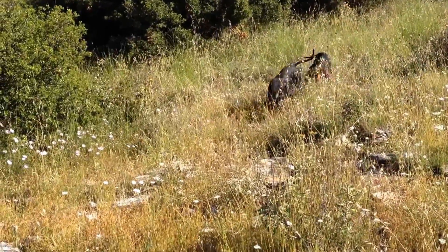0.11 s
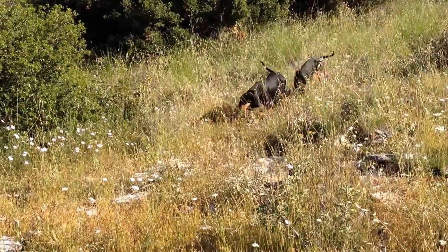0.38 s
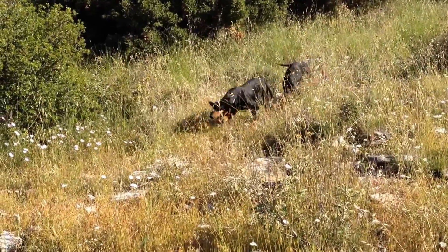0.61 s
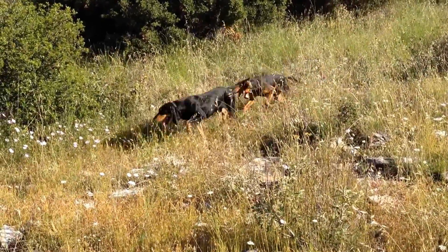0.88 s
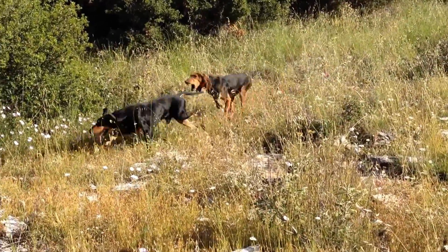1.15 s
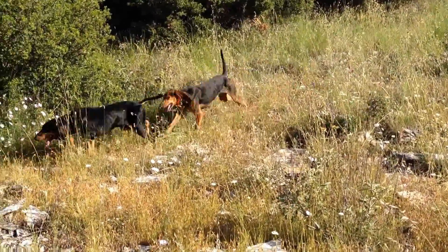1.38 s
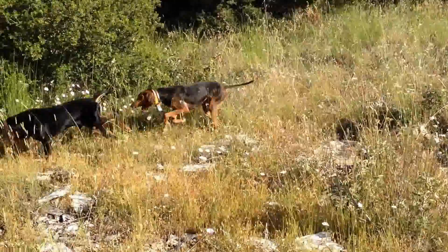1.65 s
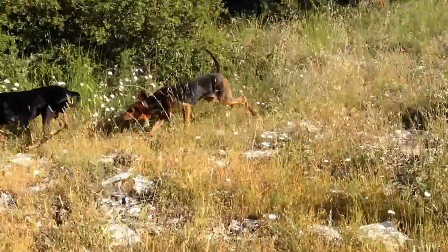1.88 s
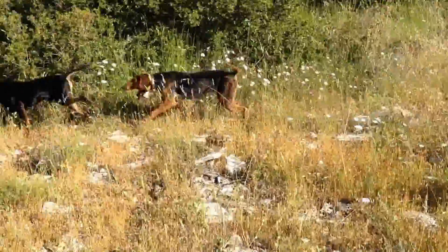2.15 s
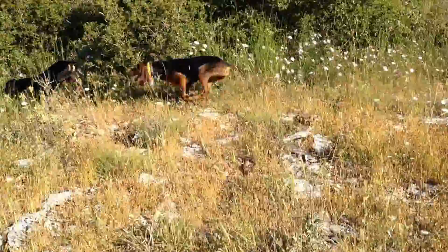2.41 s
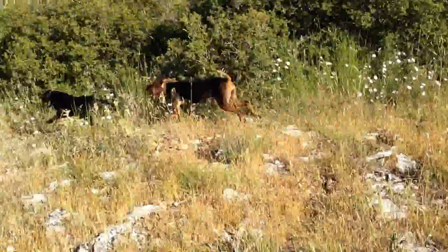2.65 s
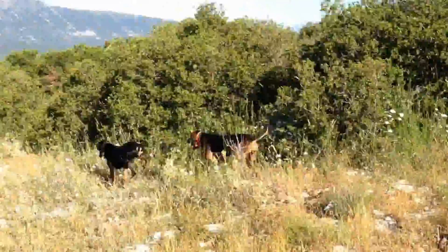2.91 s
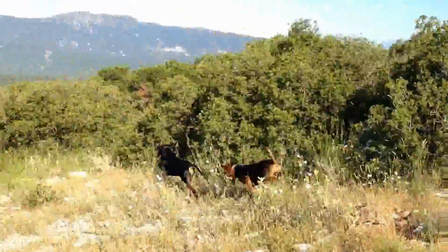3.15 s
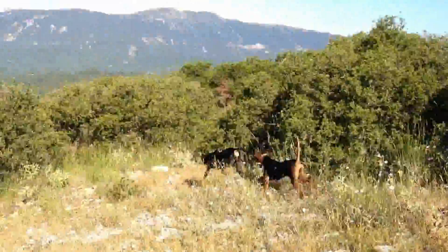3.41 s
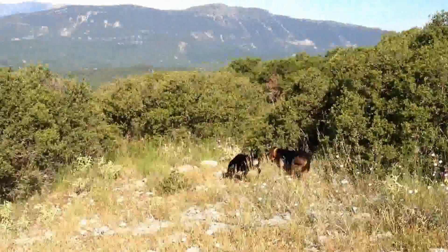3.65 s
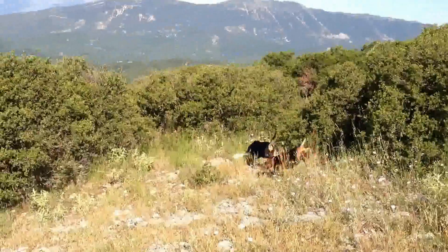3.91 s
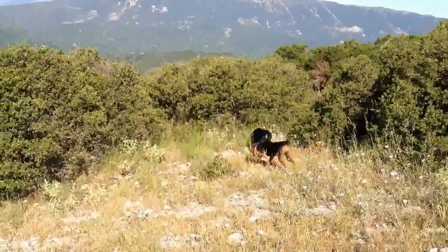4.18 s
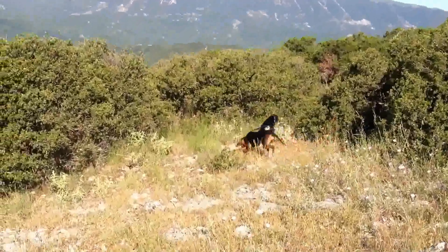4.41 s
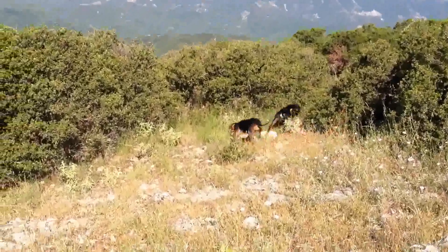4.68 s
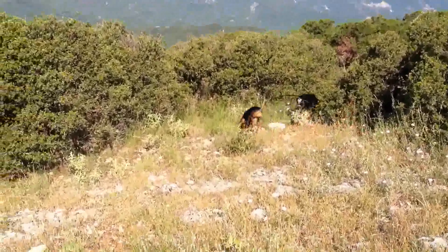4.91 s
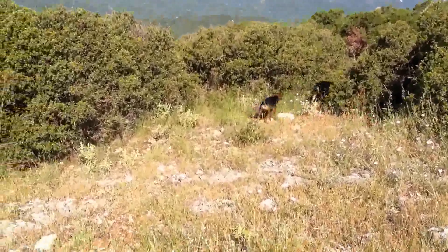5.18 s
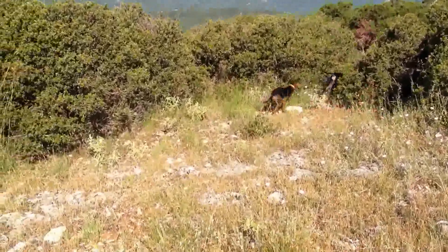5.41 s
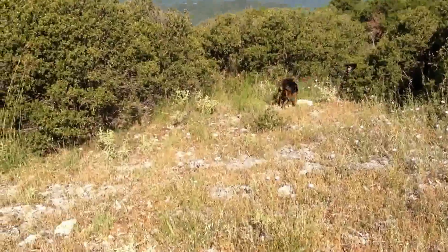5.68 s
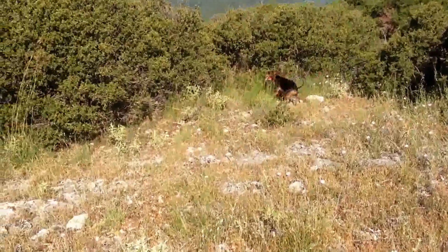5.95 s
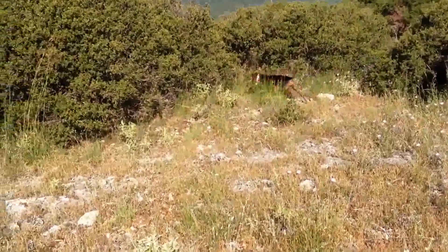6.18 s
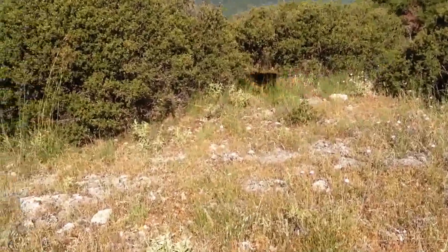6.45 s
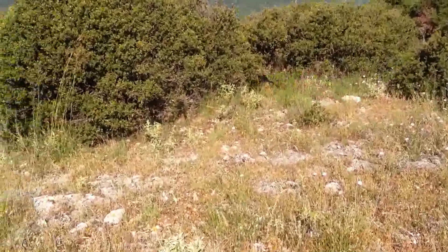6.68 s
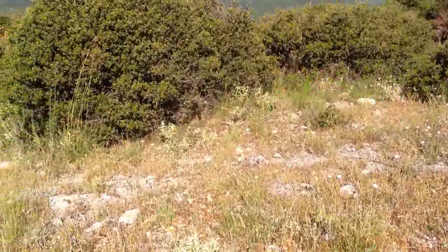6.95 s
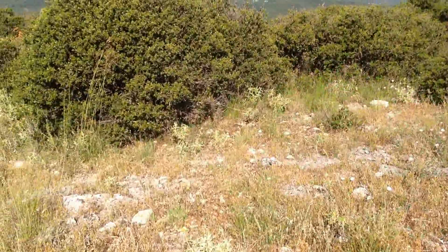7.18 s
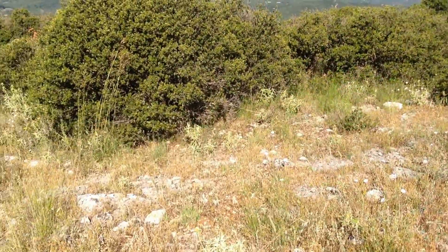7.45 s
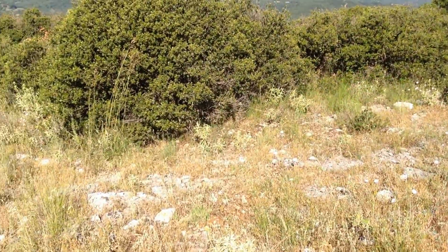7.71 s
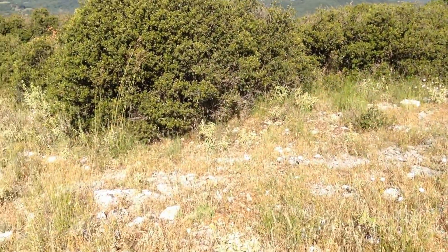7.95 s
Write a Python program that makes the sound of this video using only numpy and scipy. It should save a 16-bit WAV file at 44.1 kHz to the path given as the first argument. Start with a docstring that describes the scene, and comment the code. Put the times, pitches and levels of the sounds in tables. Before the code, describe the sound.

Loose, irregular clanking from two small metal bells begins softly, then comes close and bright with rustling stalks and a sharp twig snap. A hound barks out six brief hoarse bays, voice breaking upward, with one higher yelp from a second dog. After that the bells recede, muffled, with light paw knocks over a quiet open-air hush and slight echoes from bushes.

```python
"""Dry grass rustles under a faint open-air hush as two sheet-metal bells start clanking on hounds' collars.
From 0.7 s one hound bays six times, its voice breaking upward; paws soon knock stones and twigs.
The other hound yelps once across the fifth bay, and near the end a faint whine sinks in pitch.
Bells ring as decaying modes, voices are partials plus breath, ground and air are shaped noise;
bushes throw a short blur back after voices and bells."""
import sys
import numpy as np
from scipy import signal
from scipy.fft import rfft, irfft
from scipy.io import wavfile
from scipy.ndimage import uniform_filter1d

SR = 44100
rng = np.random.default_rng(int(sys.argv[2]) if len(sys.argv) > 2 else 0)


def nominal_scale(level):
    """Amplitude ratio for a level in decibels (scalar or array-like)."""
    x = np.asarray(level, float) / 20
    return 10 ** x


def master_out(mix):
    """Clip the mix to full scale and print it as 16-bit PCM to the path in sys.argv[1]."""
    frames = np.transpose(np.atleast_2d(mix))
    ceiling = np.clip(frames, -1, 1)
    pcm = np.round(ceiling * 32767).astype(np.int16)
    wavfile.write(sys.argv[1], SR, pcm)


N = 356328
T = np.arange(N) / SR


def band(x, hz, width_hz):
    """Two-pole resonance, gain 1 at the centre."""
    return signal.lfilter(*signal.iirpeak(hz, hz / width_hz, fs=SR), x)


def level(x, db):
    """Scale to an rms level."""
    return x * nominal_scale(db) / np.sqrt(np.mean(x ** 2))


def walk(rate):
    """Random levels held 1 / rate s and slewed twice; spread near 1."""
    hold = int(SR / rate)
    steps = np.repeat(rng.standard_normal(N // hold + 1), hold)
    return 1.3 * uniform_filter1d(uniform_filter1d(steps, hold), hold)[:N]


# Colour of the open air. Each row: frequency in Hz, relative density in dB per Hz.
AIR_COLOUR = [(60, -17.5), (200, -4.5), (900, -8.5), (3000, -9), (8000, -16.5), (14000, -29),
              (16000, -23.5)]


def hush():
    """Smooth distant air: steady noise shaped across its spectrum."""
    hz, db = np.transpose(AIR_COLOUR)
    log_hz = np.log(np.arange(N // 2 + 1) * SR / N + 1)
    colour = nominal_scale(np.interp(log_hz, np.log(hz), db))
    return level(irfft(rfft(rng.standard_normal(N)) * colour, N), -68.5)


# Stir of the ground. Each row: time in seconds, grass level in dB, low rumble level in dB,
# both before the fixed trims below.
GROUND_LEVELS = [(0.0, -73.5, -74), (1.28, -56.5, -64), (2.23, -60, -66.5), (2.34, -57, -61),
                 (4.63, -64, -75.5), (5.71, -74, -81), (8.08, -68.5, -82)]


def ground():
    """Dry stalks crackle in tiny grains; a low rumble wavers under them."""
    s, grass_db, rumble_db = np.transpose(GROUND_LEVELS)
    grains = rng.standard_normal(N) * nominal_scale(2.5 * walk(400) + 2 * walk(35))
    grass = level(band(grains, 2500, 4100), 0.86) * nominal_scale(np.interp(T, s, grass_db))
    rumble = level(band(band(rng.standard_normal(N), 190, 260), 190, 260), -2.9)
    return grass + rumble * nominal_scale(np.interp(T, s, rumble_db) + 2.6 * walk(16))


# Motion of the hounds. Each row: time in seconds, speed towards the microphone in m/s
# of the first hound and of the second.
HOUND_SPEEDS = [(0.0, 2.6, 3.3), (0.9, 2.4, 4.1), (1.5, 1.7, 4.1), (2.1, -0.2, 2.4), (2.7, -2.1, 0.3),
                (3.6, -1.9, -0.2), (4.2, -1.7, 0.0), (4.5, 0.3, 0.2), (5.1, 0.7, 1.2), (5.7, 0.7, 2.7),
                (6.3, 0.5, 2.2), (7.2, -1.9, 0.0), (7.5, 3.4, 0.0)]
# Top mode family against the upper ring. Each row: time in seconds, first bell in dB, second bell in dB.
TOP_FAMILY_DB = [(0, -7, -0.5), (1.2, -8.5, -1), (2.2, -10, -1), (3.2, -12.5, 2.5), (4.3, -15, 8),
                 (5.2, -6, 6), (6.2, -9.5, 5.5), (8.1, -6, 4.5)]
# Treble lost on the way through air and leaves. Each row: time in seconds, loss in dB at 12.3 kHz.
TREBLE_LOSS = [(0, -1.5), (1.5, 1.5), (2.8, -1.5), (4, 11.5), (6, 11), (8.1, 8)]
# spread of a 10 kHz mode from blow to blow; flutter of the lowest modes, doubled at 4.2 kHz
SCATTER_DB, CHATTER_DB = 4, 2.5
SMEAR_RAD = 1.1  # wander of a mode's phase at 7.2 kHz
# light bounces after a blow: average taps a second, dB under the blow, fading time constant in s
BOUNCES_PER_S, BOUNCE_DB, BOUNCE_S = 31, -12, .12


def bell(blows, families, hound, clank):
    """Each clapper blow stops the old ring and starts every mode afresh, with a short tick."""
    s, *dbs = np.transpose(blows)
    top_s, top_db = np.transpose(TOP_FAMILY_DB)[[0, hound]]
    # the top family follows the upper ring
    dbs.append(dbs[2] + np.interp(s, top_s, top_db))
    last = np.clip(np.searchsorted(s, T, side="right") - 1, 0, None)
    age = np.where(T >= s[0], T - s[last], 9.)
    speed = np.interp(T, *np.transpose(HOUND_SPEEDS)[[0, hound]])
    heard = np.cumsum(1 + speed / 343) / SR  # Doppler: time as it reaches the microphone
    loss_db = np.interp(T, *np.transpose(TREBLE_LOSS))
    out = np.zeros(N)
    for family_db, modes in zip(dbs, families):
        for hz, db, t60 in modes:
            chance = rng.standard_normal((len(s), 2))
            # the loose clapper chatters on the wall: size and phase of the ring flutter
            flutter = walk(90) * (1 - np.exp(-age / .015))
            blow_db = family_db + db + SCATTER_DB * hz / 1e4 * chance[:, 0]
            ring_db = blow_db[last] - 60 * age / t60
            flutter_db = CHATTER_DB * (1 + hz / 4200.0) * flutter
            size = nominal_scale(ring_db + flutter_db - loss_db * (hz / 12300.0) ** 2)
            rise = 1 - np.exp(-age * hz / 1.5)  # time constant of 1.5 cycles
            wander = SMEAR_RAD * hz / 7200.0 * walk(80)
            out += size * rise * np.sin(2 * np.pi * hz * heard + 3 * chance[last, 1] + wander)
    # bounces ring the first-listed clank mode, t60 0.07 s
    clank_hz = families[clank][0][0]
    taps = (rng.random(N) < BOUNCES_PER_S / SR) * rng.standard_normal(N)
    taps *= nominal_scale(dbs[clank][last] + BOUNCE_DB) * np.exp(-age / BOUNCE_S)
    pole = np.exp(2j * np.pi * clank_hz / SR - np.log(1000) / (.07 * SR))
    out += signal.lfilter([1], [1, -pole], band(taps, clank_hz, 600)).imag
    blow = np.sqrt(np.sum(nominal_scale(np.array(dbs[2:])) ** 2, axis=0))[last]
    tick = band(rng.standard_normal(N), 6000, 4300) * np.exp(-age / 0.0033)
    tick += nominal_scale(-6.5) * band(rng.standard_normal(N), 12000, 6000) * np.exp(-age / 0.0014)
    # modes too dense to part leave a brief bright wash
    tick += nominal_scale(-16.5) * band(rng.standard_normal(N), 9500, 7000) * np.exp(-age / 0.02)
    # so small a body radiates no bass
    no_bass = signal.butter(4, 1200, "high", fs=SR, output="sos")
    return signal.sosfilt(no_bass, out + blow * tick)


# Clapper blows on the second collar. Each row: start in seconds, level in dB of the clank,
# of the middle ring, of the upper ring.
SECOND_CLAPPER = [(0.0, -43, -51, -50.5), (.2185, -47.5, -55, -58.5), (.3362, -59, -72, -59.5),
                  (.5213, -51.5, -53, -55.5), (.6316, -50, -60, -56), (.9603, -58, -56, -50),
                  (1.1155, -28.5, -39, -38.5), (1.2267, -54, -52.5, -41), (1.3599, -36, -37.5, -35.5),
                  (1.9785, -60, -49.5, -51), (2.1411, -43, -50.5, -51.5), (2.208, -22, -35, -28.5),
                  (2.243, -34, -44, -41.5), (2.2579, -22.5, -50, -33.5), (2.3836, -46, -50, -44),
                  (2.4529, -39.5, -47.5, -51.5), (2.5707, -33.5, -44, -54), (2.6824, -52.5, -45, -44.5),
                  (2.9004, -33.5, -51, -51), (3.062, -32.5, -43.5, -48.5), (3.282, -36.5, -41, -41),
                  (3.4222, -44, -52, -50), (3.4566, -38, -47.5, -48.5), (3.534, -43, -48.5, -49),
                  (3.6916, -38.5, -40.5, -46), (3.7839, -41, -42, -45), (3.8468, -34.5, -37, -43.5),
                  (4.0563, -52.5, -44, -48.5), (4.1556, -38.5, -53, -43.5), (4.2049, -22, -32.5, -35.5),
                  (4.255, -35.5, -42, -49.5), (4.3466, -39, -44, -46.5), (4.4424, -37, -39, -47),
                  (4.5931, -46, -46.5, -49.5), (4.7188, -32.5, -41, -43.5), (4.845, -48.5, -61, -56.5),
                  (5.0291, -45, -59.5, -57), (5.2501, -49.5, -45, -52.5), (5.4047, -49.5, -56, -54.5),
                  (5.707, -46, -71.5, -56), (5.7255, -54.5, -76, -58), (6.1919, -45.5, -49, -50),
                  (6.2518, -49.5, -51, -52), (6.7342, -39, -52.5, -57.5), (7.0595, -35.5, -51, -59),
                  (7.1128, -37, -50, -49), (7.2815, -61, -55.5, -58.5), (7.5084, -38, -51, -54.5),
                  (7.7883, -65.5, -60.5, -62.5)]
# Four mode families, low to high. Each row in a family: frequency in Hz, relative level in dB, t60 in seconds.
SECOND_MODES = [
    [(1535, 2, .17), (1505, -11, .5)],
    [(3745, -2, .7), (3800, -9, .4)],
    [(5045, -4, .45), (6050, -6, .35), (6410, -6, .3), (6700, -3, .45)],
    [(8035, -7, .25), (8670, -6, .25), (8960, -13, .2), (9130, -8, .25), (10050, -14, .2),
     (10780, -10, .25), (12020, -15, .2), (12400, -12, .2), (13430, -12, .2), (14200, -17, .2),
     (15000, -17, .15)],
]


def second_bell():
    """The second hound's sheet metal clanks in its lowest mode family."""
    return bell(SECOND_CLAPPER, SECOND_MODES, hound=2, clank=0)


# Clapper blows on the first collar. Each row: start in seconds, level in dB of the hum,
# of the clank, of the upper ring.
FIRST_CLAPPER = [(.0569, -84, -39, -60), (.074, -63, -40.5, -50), (.2504, -66, -36.5, -48),
                 (.2908, -55, -54, -49), (.3083, -56, -35, -50.5), (.5817, -50, -37.5, -42.5),
                 (.657, -68, -44, -54.5), (.7488, -61, -29, -43), (1.0396, -70.5, -31, -36.5),
                 (1.07, -86, -58.5, -37), (1.2267, -62, -52, -31), (1.365, -62.5, -27, -45.5),
                 (1.4123, -68, -29.5, -30.5), (1.532, -49, -19.5, -38), (1.5634, -60, -45, -30.5),
                 (1.7655, -47.5, -17.5, -26), (1.85, -49, -43.5, -42.5), (1.9401, -67.5, -38.5, -46.5),
                 (2.0294, -61, -32.5, -48), (2.4529, -53, -45, -45.5), (2.5707, -57, -47, -43),
                 (2.9727, -54.5, -33, -41), (3.4222, -63.5, -48, -58), (3.975, -68, -36.5, -50),
                 (4.0244, -66, -28.5, -38.5), (4.07, -67, -32.5, -48.5), (4.189, -53.5, -32.5, -58),
                 (4.3466, -51, -27.5, -39), (4.6619, -58, -30.5, -47), (4.8235, -58.5, -43.5, -48),
                 (4.9193, -58, -38.5, -43.5), (4.9862, -60, -37.5, -48.5), (5.075, -58, -46, -54),
                 (5.3204, -67.5, -42, -54.5), (5.48, -64, -47, -70.5), (5.555, -73, -50, -68),
                 (5.655, -66, -57.5, -69), (5.69, -68, -54, -61.5), (5.7509, -84, -44, -56),
                 (5.813, -54.5, -47.5, -69), (5.845, -62.5, -55, -66), (5.868, -67.5, -54.5, -69.5),
                 (5.9879, -49.5, -39, -49.5), (6.0976, -49, -31, -54.5), (6.2837, -47.5, -34.5, -49.5),
                 (6.3426, -65.5, -37.5, -54), (6.591, -60.5, -43, -50.5), (6.6274, -74, -49, -51.5),
                 (6.7167, -72, -34, -44), (6.803, -49, -34.5, -66), (6.8544, -63, -44, -65),
                 (7.0131, -59, -48, -53.5), (7.2051, -65, -38, -76), (7.2505, -66, -48, -63.5),
                 (7.4236, -52, -34.5, -59), (7.5369, -40.5, -31.5, -45), (7.575, -47, -48, -64.5),
                 (7.69, -61, -32, -55.5), (7.7609, -62, -39.5, -73), (7.8287, -52, -33, -62),
                 (8.0008, -38, -29, -43), (8.0135, -44, -25, -45), (8.035, -48.5, -37, -51.5)]
# Four mode families, low to high. Each row in a family: frequency in Hz, relative level in dB, t60 in seconds.
FIRST_MODES = [
    [(1453, -2, 1.2)],
    [(1610, -6, .2), (1630, 6, .035)],
    [(3371, -5.5, 0.41), (3834, -2, 0.35)],
    [(5460, 1.5, 0.049), (6596, -2.5, 0.78), (6875, 3, 0.28), (8100, 0, 0.14), (8900, -14.5, 0.05),
     (10660, -14.5, 0.067), (10930, -1.5, .2), (11280, -12.5, 0.33), (11900, -15.5, 0.22), (12300, -11, .2),
     (13300, -17.5, 0.203), (13760, -14, .2), (14220, -12.5, .2), (14770, -14, .15)],
]


def first_bell():
    """The first hound's sheet metal hums in its lowest family and clanks in the second."""
    return bell(FIRST_CLAPPER, FIRST_MODES, hound=1, clank=1)


# the mouth resonance climbs as the jaws part; partials fall off on both sides of it
SHUT_HZ, OPEN_HZ, UNDER_DB_PER_OCT, OVER_DB_PER_OCT = 642.5, 1990, 11, 22
# the mouth rings again an octave higher, narrower and weaker
SECOND_DB, SECOND_DB_PER_OCT = -14.5, 49
# breath under the voice, its growth per 100 Hz of sag below the slack pitch, and its ceiling
RASP_DB, SAG_RASP_DB, MOST_RASP_DB = -18.5, 21.5, -6.5
# Base level kept by partials 1 to 4 before the aim is added: one value each in dB.
PARTIAL_BASE_DB = [-23, -23, -26.5, -32.5]
# What throat and muzzle let out. Each row: frequency in Hz, gain in dB.
MUZZLE_GAIN = [(2000, -0.5), (2500, -5.5), (3200, -19.5), (4500, -5.5), (7000, -18)]
# Hoarseness of the voice. Each row: time in seconds, extra breath in dB (negative is clearer).
EXTRA_BREATH = [(.75, 3), (.81, 2.5), (.83, -7.5), (.88, -5.5), (.9, 5), (1.14, 7), (1.152, -7),
                (1.18, -1.5), (1.24, -2), (1.26, 5.5), (1.57, 11), (1.59, -1.5), (1.62, 2.5), (1.64, -5.5),
                (1.69, 3.5), (2.25, 14), (2.27, 2.5), (2.305, 9), (2.37, -1), (2.41, -7), (2.7, 4),
                (2.75, 8), (2.8, 0.5), (2.89, 9.5), (3.165, -3), (3.21, 8.5), (3.24, -1.5), (3.3, 2)]


def partials(s, hz, db, mouth, slack_hz, shut_hz, aim_db):
    """Gains of partials 1 to 4 under the mouth resonance, and the share of breath."""
    lines_hz = np.arange(1, 5)[:, None] * hz
    mouth_hz = shut_hz * (OPEN_HZ / SHUT_HZ) ** mouth
    octaves = np.log2(lines_hz / mouth_hz)
    shape = nominal_scale(np.minimum(UNDER_DB_PER_OCT * octaves, -OVER_DB_PER_OCT * octaves))
    shape += nominal_scale(SECOND_DB - SECOND_DB_PER_OCT * np.abs(octaves - 1)) * np.clip(mouth, 0, 1)
    base = nominal_scale(np.array(PARTIAL_BASE_DB) + [0, 0, *aim_db])[:, None]
    shape = shape / shape.max(axis=0) + base
    shape *= nominal_scale(np.interp(lines_hz, *np.transpose(MUZZLE_GAIN)))
    gains = nominal_scale(db) * shape / np.sqrt(np.sum(shape ** 2, axis=0))
    sag = np.clip((slack_hz - hz) / 100, 0, None)
    rasp_db = RASP_DB + np.interp(s, *np.transpose(EXTRA_BREATH)) + SAG_RASP_DB * sag
    return np.vstack([gains, nominal_scale(np.minimum(rasp_db, MOST_RASP_DB))])


# Throat resonances that colour the breath. Each row: centre in Hz, width in Hz, level in dB.
THROAT_BANDS = [(705, 320, -7.5), (1286, 560, -6), (2020, 650, -9), (2438, 500, -12.5), (3400, 280, -27),
                (4600, 1600, -30.5), (6800, 1400, -24.5)]


def voice(stretches, slack_hz, shut_hz, aims_db):
    """Partials on a pitch that wobbles more as it roughens, plus breath puffed once a cycle."""
    hz, gains = np.full(N, 600.), np.zeros((5, N))
    for rows, aim_db in zip(stretches, aims_db):
        s, *columns = np.transpose(rows)
        on = (T >= s[0]) & (T < s[-1])
        pitch, db, mouth = (np.interp(T[on], s, c) for c in columns)
        hz[on] = pitch
        gains[:, on] = partials(T[on], pitch, db, mouth, slack_hz, shut_hz, aim_db)
    jitter = (.005 + .047 * gains[4]) * walk(300)
    # from 25 Hz below the slack pitch the folds lose their beat
    jitter += .09 * np.clip((slack_hz - 25 - hz) / 100, 0, 1) * walk(400)
    gains[4] *= np.sqrt(np.sum(gains[:4] ** 2, axis=0))
    gains = uniform_filter1d(gains, size=200, axis=1)
    phase = 2 * np.pi * np.cumsum(hz * (1 + jitter)) / SR
    out = sum(np.sqrt(2) * g * np.sin((k + 1) * phase) for k, g in enumerate(gains[:4]))
    # partials above the fourth die away step by step and flicker
    upper = nominal_scale(-9) * gains[3] + nominal_scale(-38) * gains[1:3].sum(axis=0)
    for k in range(1, 9):
        out += upper * nominal_scale(-4 * k + 4 * walk(40)) * np.sin((k + 4) * phase)
    breath = rng.standard_normal(N) * np.exp(1.5 * np.cos(phase))
    rasp = np.zeros(N)
    for k, (f, width_hz, db) in enumerate(THROAT_BANDS):
        resonance = band(band(breath, f, width_hz), f, width_hz)
        rasp += (-1) ** k * nominal_scale(db + 2 * walk(50)) * resonance  # neighbours in opposite sign
    return out + gains[4] * level(rasp, 0)


# The first hound's six bays, one curve per bay. Each row: time in seconds, pitch in Hz, level in dB,
# mouth opening from 0 to 1.
BAY_CURVES = [
    [(.735, 478.4, -59, 0.33), (.763, 633, -24, 1), (.778, 648.2, -16, 0.28), (.801, 674, -9, 0),
     (.812, 600.7, -11.5, 0.01), (.872, 648, -9, 0), (.885, 637.7, -17.5, 0.52), (.902, 576.5, -20, .6),
     (.911, 584, -35.5, 0.3)],
    [(1.148, 597, -15.5, 0.74), (1.178, 566.1, -10.5, 0.54), (1.196, 582.2, -13, 0.53),
     (1.202, 624, -17, 0.31), (1.245, 647.6, -10, 0), (1.252, 637.8, -18.5, 0), (1.262, 568, -19, 0.72),
     (1.277, 574, -24, 0.43)],
    [(1.58, 571, -19, 0.5), (1.592, 584, -14, 0.82), (1.615, 630, -16, 0.24), (1.639, 637.3, -10, 0.12),
     (1.68, 641.7, -11, 0), (1.69, 587.4, -21, 0.44), (1.72, 393.5, -38, 0.12)],
    [(2.258, 614, -17, 0.6), (2.266, 611.2, -11.5, 0.91), (2.29, 649.2, -13, 0.82),
     (2.306, 648.4, -13, 0.1), (2.33, 649.6, -8.5, 0.05), (2.37, 649, -8.5, 0.04),
     (2.398, 608.8, -16.5, 0.34), (2.402, 558, -23, 0.86), (2.416, 450.6, -25.5, 1),
     (2.435, 378.6, -48.5, 0)],
    [(2.714, 564, -32.5, 0.4), (2.728, 590, -17, 0.98), (2.76, 640, -19.5, .02), (2.778, 636, -11.5, 0.04),
     (2.8, 643, -9.5, .15), (2.82, 641, -13.5, .15), (2.838, 592, -34.5, .45)],
    [(3.18, 565, -35, 0.7), (3.204, 571, -24.5, 0.66), (3.22, 595, -20.5, 0.38), (3.24, 619, -16.5, 0.05),
     (3.288, 615.8, -17, 0.21), (3.292, 574, -29, 0.12), (3.304, 473, -26.5, 1), (3.32, 367, -43, 0.22)],
]
# Where the muzzle points, one pair per bay: change in dB of the base level of the third partial
# and of the fourth.
BAY_AIMS = [(-9, 7), (-1, -1), (12.5, -2.5), (9, -1.5), (0.5, -9), (-6, 5)]


def bays():
    """Six bays arch in pitch while the mouth opening and aim recolour their partials."""
    return voice(BAY_CURVES, 600, SHUT_HZ, BAY_AIMS)


# Short breaks into a higher voice that open or close a bay. Each row: start in seconds, length in seconds,
# top pitch in Hz, level in dB, mouth opening from 0 to 1.
VOICE_BREAKS = [(0.905, .028, 714, -29, 0), (1.12, .038, 798, -20, 0.16), (1.265, .035, 782, -31.5, 0.34),
                (1.548, .04, 771, -20.5, 0.45), (2.23, .034, 958, -16.5, 0.75),
                (2.683, .044, 889, -19.5, .55), (3.152, .036, 870, -20, 0)]
# swell and hold end at these shares of the length; start pitch as share of the top; dB against the top
SWELL, HOLD, SLIDE, START_DB, END_DB = 0.48, 0.92, 0.8, -26, -12


def breaks():
    """Every break slides up to its top pitch as it swells, holds, then fades."""
    curves = []
    for s, length, hz, db, mouth in VOICE_BREAKS:
        curves.append([(s, SLIDE * hz, db + START_DB, mouth),
                       (s + SWELL * length, hz, db, mouth),
                       (s + HOLD * length, hz, db, mouth),
                       (s + length, hz, db + END_DB, mouth)])
    return voice(curves, 804, SHUT_HZ, [(-8, -7.5)] * len(curves))


# Paws on stones, through stalks and on dry twigs. Each row: start in seconds, peak level in dB,
# centre in Hz, time from start to peak in seconds.
PAW_KNOCKS = [(2.332, -41, 112, 0.01), (2.679, -33.5, 870, 0.0066), (2.685, -32, 188.2, 0.0096),
              (3.956, -40.5, 500, 0.0027), (4.144, -48, 220, .006), (4.229, -46.5, 260, 0.0046),
              (4.3, -35, 270, 0.0024), (4.774, -57, 260, 0.05), (4.892, -49.5, 6000, 0.054),
              (4.938, -45.5, 507, 0.018), (4.967, -41.5, 955, .007), (4.969, -48.5, 160, .012),
              (6.346, -53.5, 200, 0.0065), (6.72, -58, 260, 0.068), (1.726, -20.5, 6140, 0.00058),
              (3.6404, -32, 2500, 0.00037), (5.1435, -27, 3460, .0003), (5.227, -45, 3500, 0.0049),
              (6.0694, -58, 6000, .0008)]


def knocks():
    """Short noise bursts, dull or sharp, that swell and die at once."""
    out = np.zeros(N)
    for s, db, hz, length in PAW_KNOCKS:
        age = np.clip(T - s, 0, None) / length
        burst = band(band(rng.standard_normal(N), hz, 1.3 * hz), hz, 1.3 * hz)
        # noise peaks stand about 10.5 dB over its rms
        out += np.e * age * np.exp(-age) * level(burst, db - 10.5)
    return out


# The other hound's yelp. Each row: time in seconds, pitch in Hz, level in dB, mouth opening from 0 to 1.
YELP_CURVE = [(2.745, 730, -22.5, 0.63), (2.773, 850, -19, 0.24), (2.792, 905, -19, .2),
              (2.812, 1021, -21, .2), (2.828, 1107, -23.5, .6), (2.844, 1135, -21, 1),
              (2.866, 1142, -23, 0.52), (2.875, 957, -27.5, 0.32), (2.884, 770, -19, 0.51),
              (2.893, 732, -32, 0.55)]


def yelp():
    """One yelp shoots up in pitch and drops back."""
    return voice([YELP_CURVE], 700, SHUT_HZ, [(-7, 10.1)])


# A faint whine. Each row: time in seconds, pitch in Hz, level in dB, mouth opening from 0 to 1.
WHINE_CURVE = [(7.493, 471, -66, .02), (7.523, 388, -52.5, .02), (7.585, 283, -71, 0.018)]


def whine():
    """A faint whine sinks in pitch through a nearly shut mouth with a low resonance."""
    return voice([WHINE_CURVE], 200, 403, [(-12, -5)])


def bushes(x):
    """Scattered echoes from the scrub; leaves return little bass."""
    t60, gap_s, wet_db = 0.24, 0.017, -28
    age = T[:SR // 2]
    leaves = band(band(rng.standard_normal(len(age)), 2100, 3200), 2100, 3200)
    tail = leaves * np.exp(-np.log(1000) * age / t60) * (age > gap_s)
    tail /= np.sqrt(np.sum(tail ** 2))
    return x + nominal_scale(wet_db) * signal.fftconvolve(x, tail)[:N]


def scene():
    """Hounds and bells in the scrub, over ground and air."""
    bells = second_bell() + first_bell()
    voices = bays() + breaks() + yelp() + whine()
    return (hush() + ground() + bushes(voices + bells) + knocks())[None]


def top_cut(x):
    """Nothing passes above the cut-off."""
    return signal.sosfilt(signal.butter(12, 16490, fs=SR, output="sos"), x)


def record(dry):
    """The microphone cuts the deep bass and the very top and rounds the loudest peaks."""
    x = signal.sosfilt(signal.butter(2, 110, "high", fs=SR, output="sos"), dry)
    x = signal.sosfilt(signal.butter(10, 15500, fs=SR, output="sos"), x)
    mix = 2.154 * np.tanh(x / 1.622)
    return top_cut(mix)


dry = scene()
out = record(dry)
master_out(out)
```